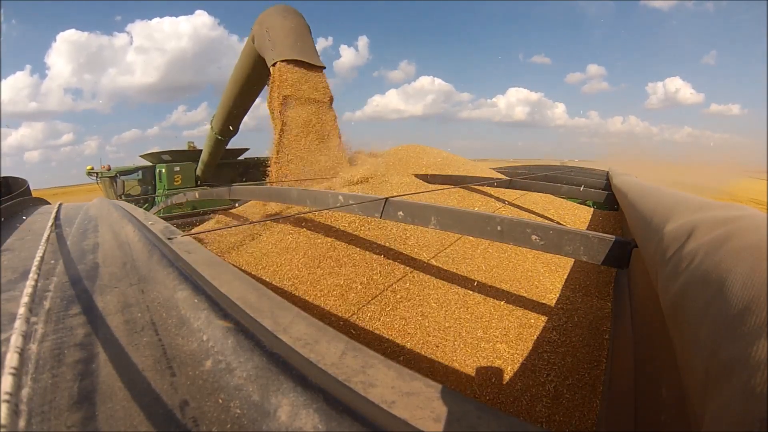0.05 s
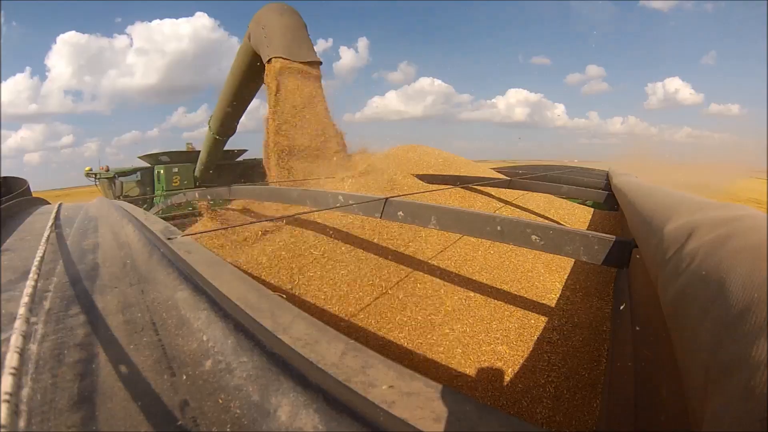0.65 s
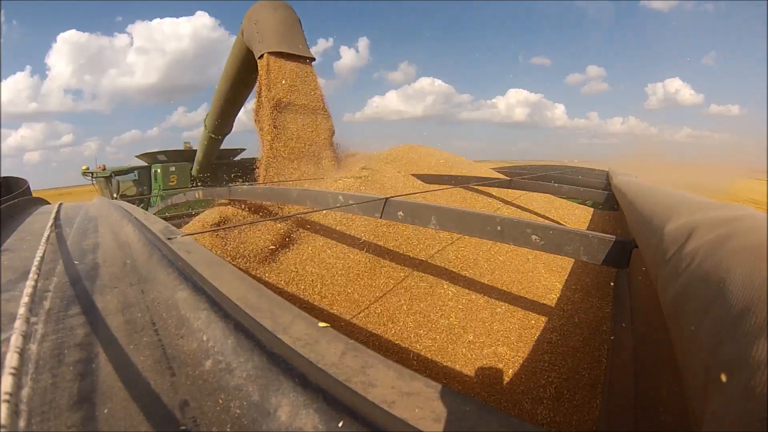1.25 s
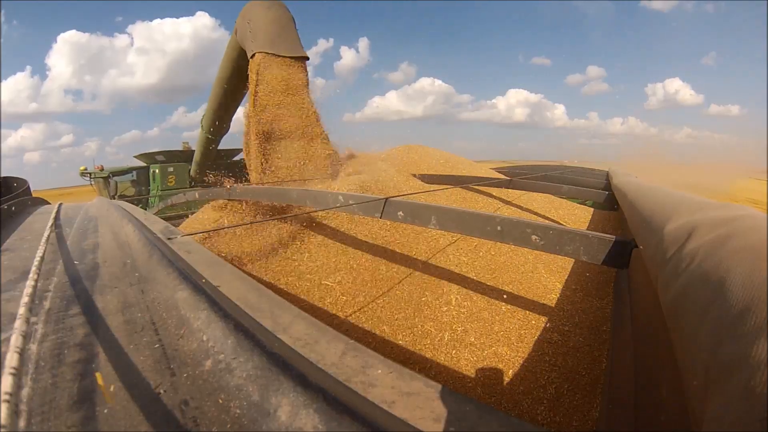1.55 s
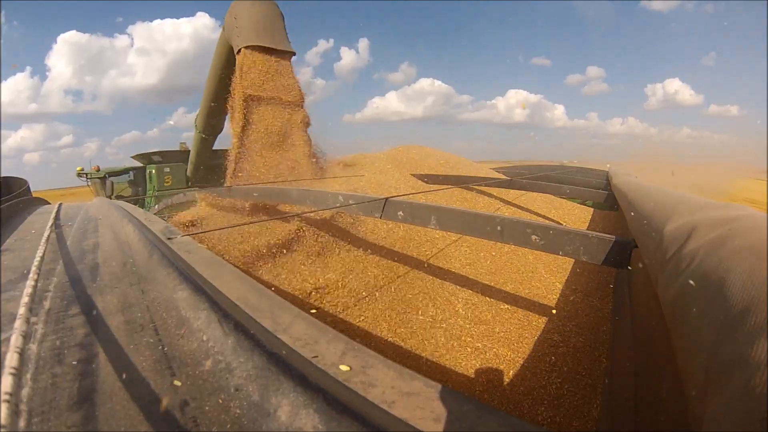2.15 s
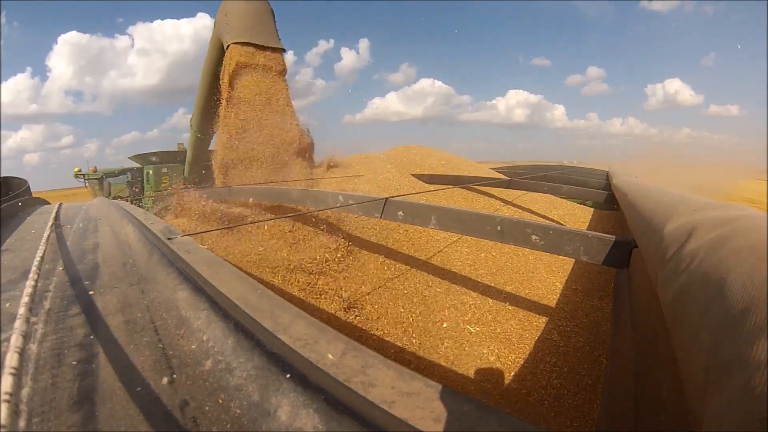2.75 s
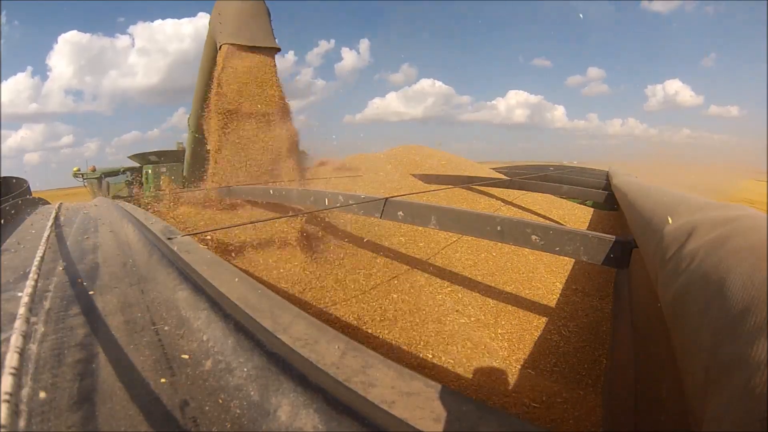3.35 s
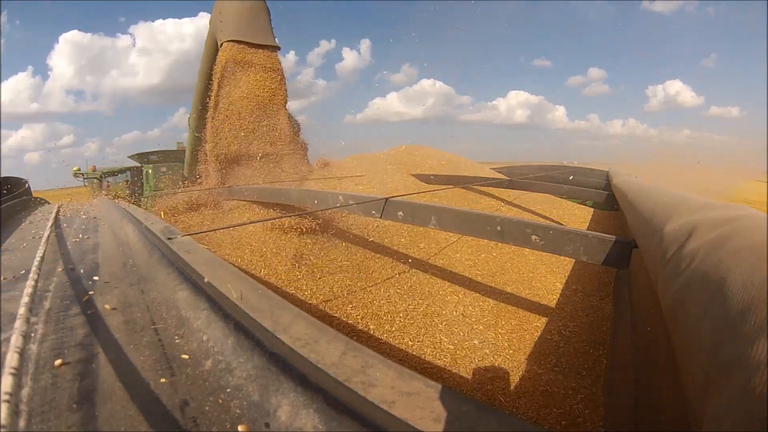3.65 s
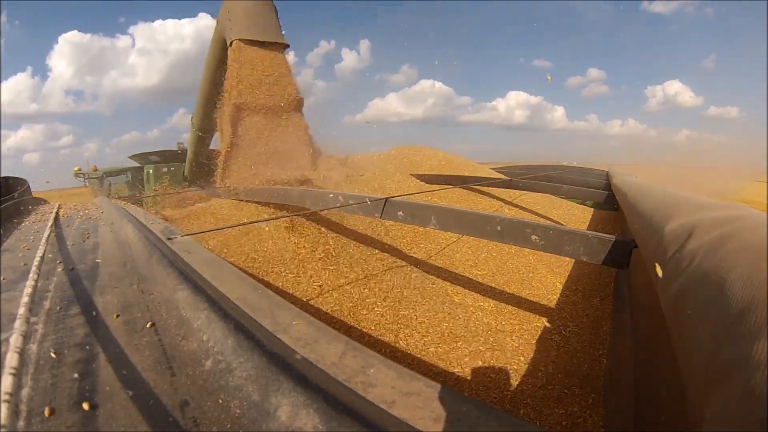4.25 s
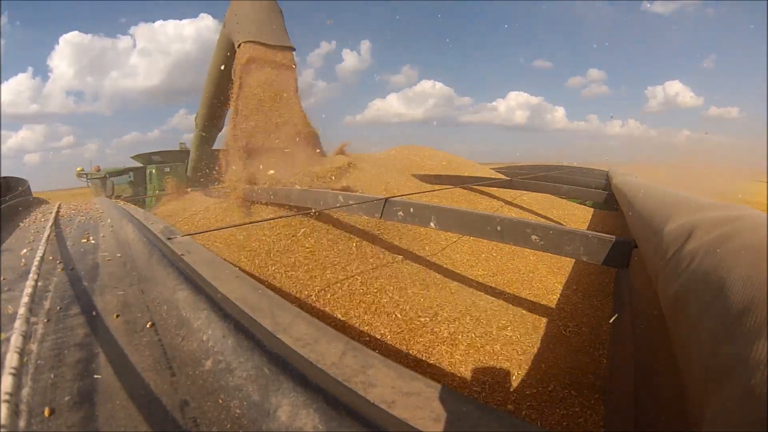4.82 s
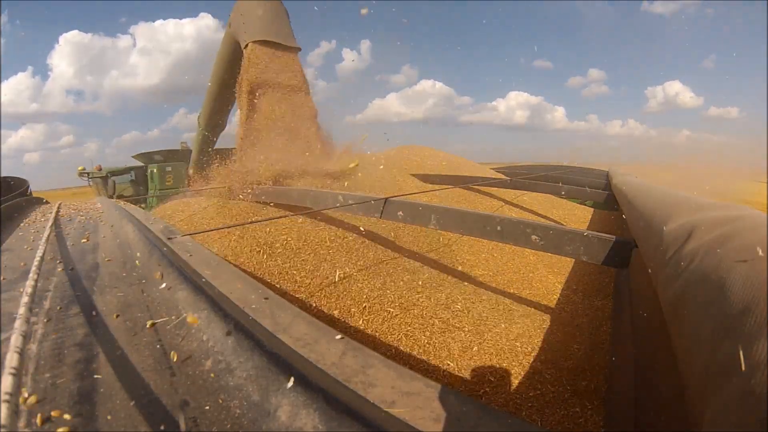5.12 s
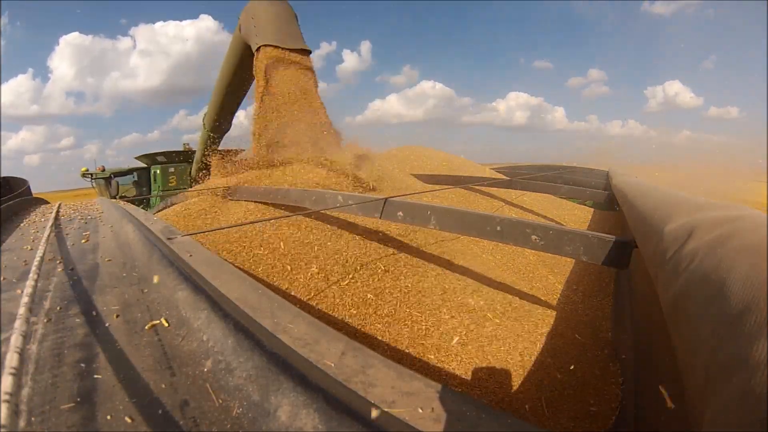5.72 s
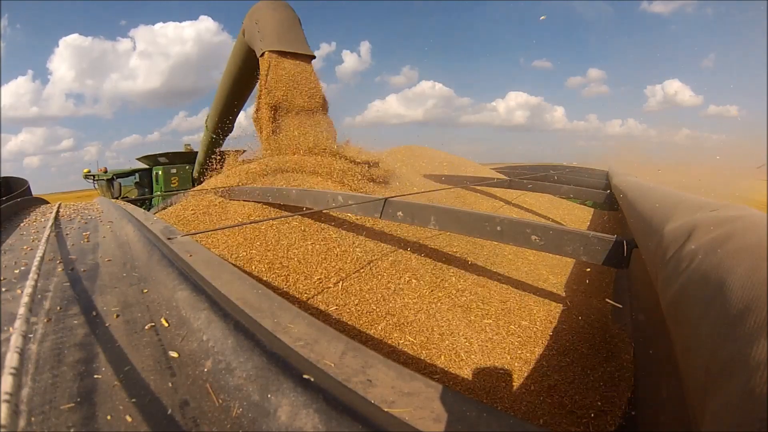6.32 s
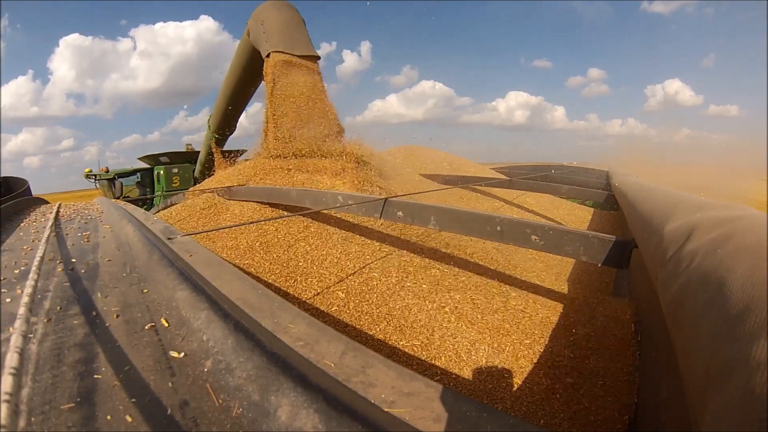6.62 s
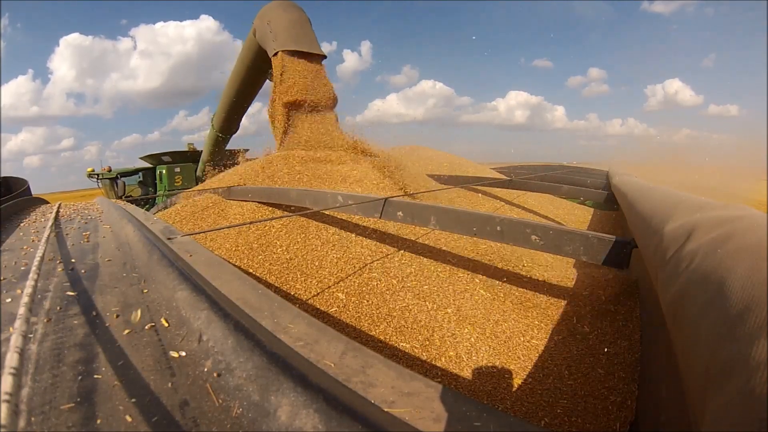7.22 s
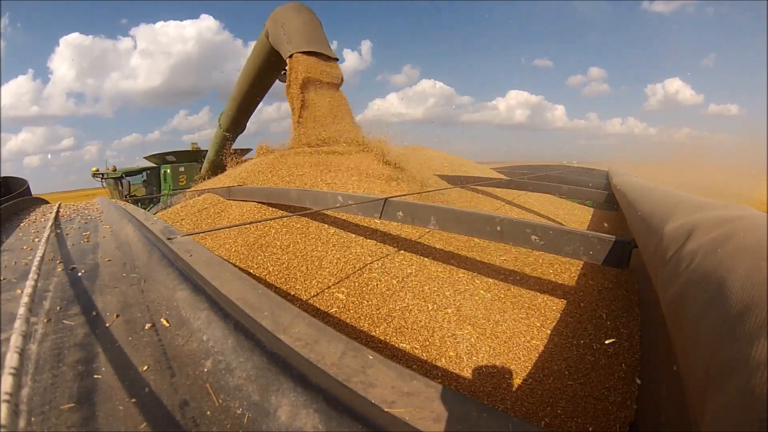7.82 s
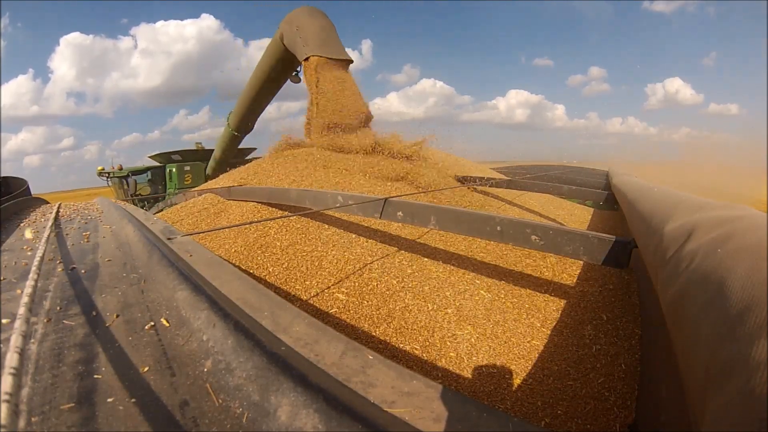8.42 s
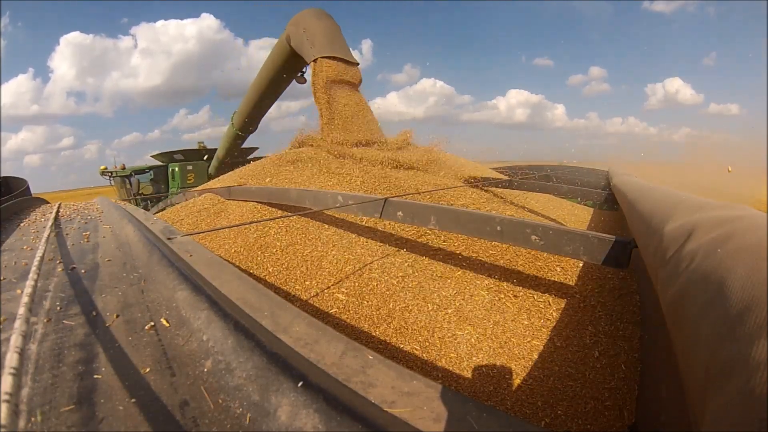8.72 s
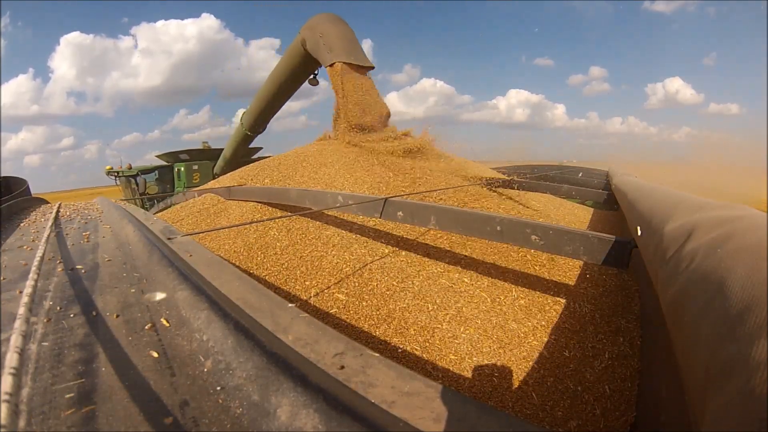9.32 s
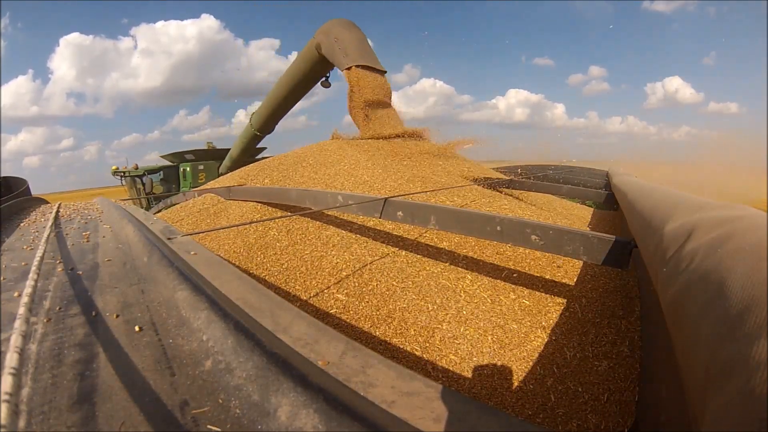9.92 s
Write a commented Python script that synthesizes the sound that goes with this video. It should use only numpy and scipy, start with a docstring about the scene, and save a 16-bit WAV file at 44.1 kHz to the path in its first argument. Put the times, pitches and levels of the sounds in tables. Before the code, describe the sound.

Kernels rush from a harvester's auger and clatter on steel, with engine drone, stray ticks and a rolling cart's low shudder.

```python
"""Corn pours from a combine's auger into a grain cart, heard from the cart's rim.
The kernels rattle the steel, hardest while the stream swings close to the near wall, and hiss on the heap.
Two diesel engines drone, and the rolling cart shudders at a very low pitch.
Stray kernels tap the cart and, at two moments, a camera fixed to the rim."""
import sys
import numpy as np
from scipy import signal
from scipy.fft import rfft, irfft
from scipy.io import wavfile

SR = 44100
rng = np.random.default_rng(int(sys.argv[2]) if len(sys.argv) > 2 else 0)


def dump(signal):
    """Clip the signal to [-1, 1] and save it as 16-bit WAV at the path in sys.argv[1]."""
    limited = np.clip(np.atleast_2d(signal).T, -1, 1)
    pcm = np.round(limited * 32767).astype(np.int16)
    wavfile.write(sys.argv[1], SR, pcm)


N = 439677
TIME = np.arange(N) / SR
HZ = np.fft.rfftfreq(N, 1 / SR)

# the pitches the cart's steel rings at (narrow ones ring longer): pitch_hz, width_hz, level_db
STEEL_RINGS = [(264, 52, -10.5), (410, 64, -11), (744.4, 62, -16), (1077, 129, -16.5), (1257, 27, -13),
               (1286, 112, -16), (1601, 90, -10.5), (1742, 97, -8), (2254, 180, -6.5), (2391, 164, -0.5),
               (2410, 23, -4), (2645, 78, -9.5), (3070, 63, -22), (3425, 170, -19.5), (3527, 25, -13),
               (3650, 14, -16.5), (3790, 66, -17), (4007, 167, -17.5), (4027, 15, -13), (4768, 116, -24.5),
               (5260, 220, -27), (5690, 147, -20.5), (5965, 176, -23.5), (6800, 230, -20.5),
               (7160, 700, -29), (9700, 700, -41.5), (10420, 510, -40.5), (11700, 370, -41),
               (13300, 330, -45), (14380, 730, -52)]
# how hard the corn hits as the spout swings to the near wall and back: time_s, level_db
POUR_STRENGTH = [(0, -34), (1.1, -33.5), (2.2, -40), (2.88, -30), (3.15, -28), (3.28, -24), (3.46, -25),
                 (3.8, -18), (4.05, -22), (4.6, -22.5), (5.03, -29.5), (5.15, -35), (5.85, -45.5),
                 (6.05, -38), (6.7, -42.5), (8.2, -51.5), (8.8, -45), (9.97, -44)]
# kernels land softly on grain or sharply on bare steel: time_s, treble_db
LANDING_HARDNESS = [(0, -5.5), (1, -4), (1.7, 1.5), (2.3, -1), (3, 2), (4, 0.5), (4.8, 0.5), (5.3, -2.5),
                    (5.9, -3), (6.6, 0), (7.5, -3.5), (8.7, 4.5), (9.97, 4.5)]
# grain sliding on the heap, mixed with the threshing din: pitch_hz, level_db
HEAP_SPECTRUM = [(200, 0.5), (560, 2.5), (700, 0.5), (1000, -1.5), (1500, -1), (2000, -7.5), (2400, -4),
                 (3000, -13), (4000, -11.5), (5000, -13.5), (6500, -14), (8200, -11), (10500, -14),
                 (12000, -17), (15000, -19)]
# the heap's rush, brighter as the heap rises over the rim: time_s, level_db, treble_db
HEAP_RUSH = [(0, -38.5, -1), (1.2, -39, -0.5), (2.2, -40.5, 2), (3, -37, -4), (4, -37.5, -10),
             (5, -35.5, -6.5), (5.3, -40.5, -1), (5.7, -38, 0), (6.3, -38, -1.5), (7, -41, 1.5),
             (8.2, -40.5, 2), (9, -41.5, 3.5), (9.97, -42, 3)]
# the tones of each engine: pitch_hz, level_db
TRACTOR_TONES = [(88.8, -54), (118.4, -54), (177.6, -50), (296, -51), (414, -50), (533, -54)]
COMBINE_TONES = [(121.5, -49), (160, -53.5), (188.4, -50.5), (289, -43), (321, -51), (380, -61),
                 (407, -49.5), (480, -55.5)]
# the tractor's exhaust note: time_s, pitch_hz, level_db
EXHAUST_NOTE = [(0, 353, -46), (.3, 353.2, -40), (1.2, 360, -38), (1.6, 355.5, -43), (2.3, 358, -40.5),
                (2.7, 359, -51), (4.1, 353.7, -44), (5.1, 356.7, -46.5), (9.97, 356.4, -48)]
# the roar of fans and threshing gear: pitch_hz, width_hz, level_db
ROAR_BANDS = [(58.4, 43, 0), (123.5, 15.6, -0.5), (191.3, 15, -0.5), (258.3, 48, 2.5), (308.5, 7.6, -0.5),
              (354, 19, -2), (396, 31, -7), (476, 57, -11.5)]
# how the roar, two machine hums and a faint whine swell and fade: time_s, level_db
ROAR_LEVEL = [(0, -29), (1.2, -32.5), (2.2, -32), (3, -29.5), (4, -30.5), (5, -35), (6.3, -33), (7.5, -32),
              (8.3, -33.5), (9.97, -35.5)]
LOW_HUM_LEVEL = [(0, -58), (1.15, -32.5), (1.5, -41), (3.55, -41), (3.9, -24), (4.25, -40.5), (5.6, -32),
                 (6.7, -44.5), (9.97, -37.5)]
HIGH_HUM_LEVEL = [(0, -44), (2.7, -45.5), (3.6, -41.5), (5.3, -43), (6.5, -41.5), (6.9, -60.5), (9.97, -49)]
WHINE_LEVEL = [(5, -65), (5.7, -48), (6.2, -46), (6.7, -59), (8, -70)]
# how fast the cart's wall swings: time_s, pitch_hz
SHUDDER_PITCH = [(0, 34), (.5, 36.35), (2.4, 36.13), (2.7, 30.84), (3.1, 36.7), (3.8, 34.5), (4.3, 36.63),
                 (5.5, 36.6), (6.9, 38), (7.5, 34.5), (8.85, 35), (9.15, 30.89), (9.7, 36)]
# the swing between bumps, less on smooth ground: time_s, level_db
IDLE_SWING = [(0, -28.5), (1.75, -32.5), (2.4, -29), (2.7, -36), (3.4, -25), (3.9, -31.5), (4.7, -28),
              (6.05, -28), (6.3, -33), (6.7, -30), (7.3, -31.5), (9.97, -29)]
# bumps that set the cart shuddering: start_s, level_db, hold_s, decay_s
GROUND_BUMPS = [(.12, -20, .08, 0.11), (0.277, -17.5, .12, 0.59), (1.476, -18.5, .12, .03),
                (1.84, -24, 0.17, .03), (2.114, -25, 0.05, 0.18), (2.83, -21, .06, 0.11),
                (3.1, -21.5, .08, .3), (4.02, -19, 0.31, .13), (5.015, -14.5, 0.4, 0.19),
                (6.96, -22.5, .18, .05), (7.451, -14, 0.076, .035), (7.659, -21, 0.19, .025),
                (7.894, -23.5, 0.1, 0.045), (8.117, -22, .33, 0.023), (8.55, -23.5, 0.22, 0.045),
                (8.81, -15.5, 0.19, 0.03), (9.14, -22, 0.046, .02), (9.256, -23, 0.12, 0.041),
                (9.522, -15, .3, 0.071)]
# thuds of the hardest jolts: middle_s, level_db, half_length_s
JOLT_THUDS = [(0.122, -46, .15), (1.65, -40, 0.15), (3.58, -37, 0.086), (5.003, -30.5, 0.063),
              (7.469, -36.5, 0.044), (8.248, -33.5, 0.2), (8.703, -39, 0.11), (8.971, -32, 0.079),
              (9.555, -24.5, 0.065), (9.722, -37, 0.06)]
# kernels hitting the camera: start_s, tick_db, knock_db, tick_length_s
CAMERA_STRIKES = [(0.5094, -24, -33, .0007), (0.5228, -32, -45, .0008), (4.0811, -8, -2, .0015)]
# the pitches in the tick of the camera's shell: pitch_hz, width_hz, level_db
SHELL_RINGS = [(6100, 1100, -2), (7700, 1000, -3), (10200, 1200, -6), (12050, 490, 1), (14200, 1130, -21)]
# single kernels and small spatters on the steel: start_s, level_db, treble_db, skitter_s
KERNEL_TAPS = [(0.835, -21, -22, .003), (0.863, -22, -28.5, 0.005), (1.584, -28, -8, 0.0069),
               (1.651, -20.5, -21, 0.0032), (1.668, -19.5, -16, 0.01), (1.82, -25, -12, 0.0058),
               (1.92, -24, -7, 0.0045), (1.997, -23, -23, 0.013), (2.299, -20.5, -20, .004),
               (2.547, -23, -15, 0.011), (2.633, -18, -24, 0.0028), (2.658, -19, -20, 0.003),
               (2.751, -17.5, -33, 0.0037), (2.825, -21.5, -8.5, .008), (2.866, -17, -19, 0.011),
               (3.087, -15, -17.5, 0.0085), (3.245, -11, -21, 0.0052), (3.2926, -15, -25, 0.006),
               (3.380, -16, -22, 0.0025), (3.988, -10.5, -34, 0.0043), (4.389, -11, -28, 0.0029),
               (4.416, -13, -30, .004), (4.595, -11.5, -20, 0.0062), (5.014, -14.5, -19, 0.0027),
               (5.428, -25, -14, 0.0036), (5.697, -22.5, -12, 0.007), (5.729, -19, -12.5, 0.013),
               (5.902, -19.5, -26, 0.0032), (5.943, -22.5, -15, 0.004), (5.957, -27, -8, 0.0043),
               (5.974, -21.5, -16, 0.012), (6.012, -14.5, -23, 0.0058), (6.044, -21.5, -12, 0.0044),
               (6.0603, -17.5, -16, .006), (6.105, -17, -25, 0.0021), (6.14, -26, -16, .003),
               (6.2613, -24, -16, .005), (6.273, -24, -15, 0.0085), (6.313, -26, -9, 0.012),
               (6.393, -25, -22, 0.0043), (6.406, -23.5, -10, 0.008), (6.524, -19.5, -20, 0.0063),
               (6.57, -33, -2, 0.0045), (6.628, -26, -16, 0.0037), (6.791, -23, -16, 0.006),
               (6.81, -25, -20, .004), (6.979, -25, -16, 0.0043), (7.010, -22.5, -17, 0.0033),
               (7.296, -31, -11, 0.009), (9.153, -28, -6, .004), (9.446, -26.5, -15, 0.0035),
               (9.468, -28, -15, 0.0085)]


def amp(db):
    """Turn decibels into a number to multiply by."""
    return 10 ** (np.asarray(db) / 20)


def evened(x):
    """Scale a signal to an average strength (rms) of 1."""
    return x / np.sqrt(np.mean(x ** 2) + 1e-20)


def curve(rows, column=1):
    """One column of a table, joined by straight lines in time."""
    columns = np.transpose(rows)
    return np.interp(TIME, columns[0], columns[column])


def add(mix, start_s, sound):
    """Mix a sound in at its start time."""
    part = mix[max(round(start_s * SR), 0):][:len(sound)]
    part += sound[:len(part)]


def response(rings, hz=HZ):
    """How strongly something that rings passes each frequency."""
    powers = (amp(db) ** 2 / (1 + 5 / 3 * ((hz - pitch) / width) ** 2) ** 2 for pitch, width, db in rings)
    return np.sqrt(sum(powers))


def ring(rings, treble_db=0, bass_db=0, size=4096):
    """The ringing after one sharp hit, with treble and bass turned up or down."""
    hz = abs(np.fft.fftfreq(size, 1 / SR))
    octaves = np.log2((hz + 1) / 2500)
    tone_db = treble_db * np.clip(octaves, 0, 1) + bass_db * np.clip(-octaves, 0, 1)
    log_gain = np.log(response(rings, hz) * amp(tone_db) + 1e-5)
    spectrum = np.exp(np.conj(signal.hilbert(log_gain)))  # nothing sounds before the hit
    return np.fft.ifft(spectrum).real[:size // 2]


def noise(gain):
    """Noise of strength 1, shaped by a gain for each frequency."""
    return evened(irfft(rfft(rng.standard_normal(N)) * gain, N))


def drift(rate_hz):
    """A slow random wander of strength 1."""
    return noise(np.exp(-(HZ / rate_hz) ** 2) * (HZ > 0))


def treble_of(sound, above_hz):
    """The high part of a sound."""
    return irfft(rfft(sound) * (1 - 1 / (1 + (HZ / above_hz) ** 6)), N)


def corn_stream(most_per_s=4600, surge_db=0.86, spread_db=2.5, clump_db=1.0, sparkle_db=1.48):
    """Thousands of kernels strike the steel in clumps; a harder pour means more of them."""
    level = amp(curve(POUR_STRENGTH) + surge_db * drift(8))
    per_s = most_per_s * np.sqrt(level / level.max())
    strikes = (rng.random(N) < per_s / SR) * rng.choice([-1, 1], N) / np.sqrt(per_s)
    strikes *= amp(spread_db * np.minimum(rng.exponential(1, N), 3.5))
    strikes *= amp(clump_db * drift(30))
    rattle = evened(signal.oaconvolve(strikes, ring(STEEL_RINGS))[:N])
    # harder, shorter hits carry more treble
    brightness = amp(curve(LANDING_HARDNESS) + sparkle_db * drift(21))
    return level * (rattle + treble_of(rattle, above_hz=3300) * (brightness - 1))


def sliding_heap(steel_share=0.5, flutter_db=1.24):
    """Sliding grain makes a smooth rush, coloured by the broad rings of the cart's walls."""
    hz, db = np.transpose(HEAP_SPECTRUM)
    grain = amp(np.interp(np.log(HZ + 1), np.log(hz), db))
    walls = response([row for row in STEEL_RINGS if row[1] > 38])
    rush = noise(grain * walls ** steel_share)
    rush += treble_of(rush, above_hz=5500) * (amp(curve(HEAP_RUSH, column=2)) - 1)
    return rush * amp(curve(HEAP_RUSH) + flutter_db * drift(15.3))


def stray_kernels(per_s=16, above_pour_db=4.0, spread_db=3):
    """Lighter kernels bounce out of the stream at random and patter on the near wall."""
    sizes = amp(curve(POUR_STRENGTH) + above_pour_db + spread_db * rng.uniform(-1, 1, N))
    strikes = sizes * (rng.random(N) < per_s / SR)
    tap = ring(STEEL_RINGS, treble_db=3, bass_db=-5)
    return signal.oaconvolve(strikes, tap / abs(tap).max())[:N]


def engine(tones, speed_wander=0.0028, waver_db=4.5):
    """Tones share one slightly unsteady speed; each wavers on its way through the open air."""
    clock = np.cumsum(1 + speed_wander * drift(2.92)) / SR
    return np.sqrt(2) * sum(
        amp(db + waver_db * drift(2.8)) * np.sin(2 * np.pi * (hz * clock + rng.random()))
        for hz, db in tones)


def hum(pitch_hz, width_hz, fuzz):
    """A wavering tone inside a narrow band of noise."""
    return evened(engine([(pitch_hz, 0)]) + fuzz * noise(response([(pitch_hz, width_hz, 0)])))


def machines():
    """Both engines drone over the roar of fans and threshing gear."""
    tractor = engine(TRACTOR_TONES, speed_wander=0.0018, waver_db=2.5)
    combine = engine(COMBINE_TONES, waver_db=4.0)
    turns = np.cumsum(curve(EXHAUST_NOTE)) / SR
    exhaust = np.sqrt(2) * np.sin(2 * np.pi * turns) * amp(curve(EXHAUST_NOTE, column=2))
    low_hum = hum(258.4, width_hz=6.5, fuzz=0.94) * amp(curve(LOW_HUM_LEVEL) - 3)
    high_hum = hum(453, width_hz=17.6, fuzz=4.1) * amp(curve(HIGH_HUM_LEVEL))
    whine = hum(1165, width_hz=35, fuzz=3) * amp(curve(WHINE_LEVEL))
    roar = noise(response(ROAR_BANDS)) * amp(curve(ROAR_LEVEL) - 5)
    return (tractor + combine) * amp(-3.5) + exhaust + low_hum + high_hum + whine + roar


def swing_size(build_s=0.066, throb_db=0.75, idle_waver_db=2.5):
    """Each bump builds the wall's swing up, holds it and lets it die back to an uneven idle."""
    power = amp(curve(IDLE_SWING) + idle_waver_db * drift(8.7)) ** 2
    for start_s, db, hold_s, decay_s in GROUND_BUMPS:
        rise = .5 + .5 * np.tanh(2 * (TIME - start_s) / build_s - .5)
        fall = np.exp(-np.maximum(TIME - start_s - hold_s, 0) / decay_s)
        power += (amp(db) * rise * fall) ** 2
    return np.sqrt(power) * amp(throb_db * drift(16))


def cart_shudder(roughness=0.1, wobble_hz=0.63, rolling_db=-37):
    """The wall swings at one low pitch over the rumble of rolling; jolts add higher thuds."""
    turns = np.cumsum(curve(SHUDDER_PITCH) + wobble_hz * drift(4.9)) / SR
    swing = np.sqrt(2) * np.sin(2 * np.pi * turns) + roughness * noise(response([(35, 3.9, 0)]))
    rolling = amp(rolling_db) * noise(response([(26.3, 9.6, 3.6), (47.8, 4.2, 0.5)]))
    jolts = sum(amp(db - 1) * np.exp(-((TIME - middle_s) / half_s) ** 2)
                for middle_s, db, half_s in JOLT_THUDS)
    thuds = jolts * noise(response([(49.0, 10, -8.5), (104, 38, -20.5)]))
    return swing * swing_size() + rolling + thuds


def camera_hits(knock_delay_s=0.0015, size=900):
    """A kernel ticks brightly on the camera's shell, then the hollow case knocks."""
    out, t = np.zeros(N), np.arange(size) / SR
    knock = ring([(1740, 110, 3), (2010, 180, -3.0), (5800, 600, -18)])
    for start_s, tick_db, knock_db, tick_s in CAMERA_STRIKES:
        contact = rng.standard_normal(size) * np.exp(-(t / tick_s) ** 2 / 2)
        tick = signal.fftconvolve(contact, ring(SHELL_RINGS))
        add(out, start_s, amp(tick_db) * tick / abs(tick).max())
        add(out, start_s + knock_delay_s, amp(knock_db) * knock / abs(knock).max())
    return out


def kernel_taps(usual_treble_db=-19, size=1800):
    """Kernels strike the steel, skitter and settle, too light to stir its low notes much."""
    out, t = np.zeros(N), np.arange(size) / SR
    for start_s, db, treble_db, skitter_s in KERNEL_TAPS:
        first_hit = t == 0
        skitter = .13 * rng.standard_normal(size) * np.exp(-(t / (2 * skitter_s)) ** 1.4)
        steel = ring(STEEL_RINGS, treble_db - usual_treble_db, bass_db=-3)
        tap = signal.fftconvolve(first_hit + skitter, steel)
        add(out, start_s, amp(db + 0.5) * tap / abs(tap).max())
    return out


def scene():
    """Add all the sounds into one channel."""
    corn = corn_stream() + sliding_heap() + kernel_taps() + stray_kernels() + camera_hits()
    return (corn + machines() + cart_shudder())[None]


def record(dry):
    """Cap the peaks at full scale, then cut the highest treble."""
    cutoff_hz = 15450
    low_pass = signal.firwin(511, cutoff_hz, window=("kaiser", 9), fs=SR)
    return signal.oaconvolve(np.clip(dry, -1, 1), low_pass[None], "same")


dry = scene()
out = record(dry)
dump(out)
```